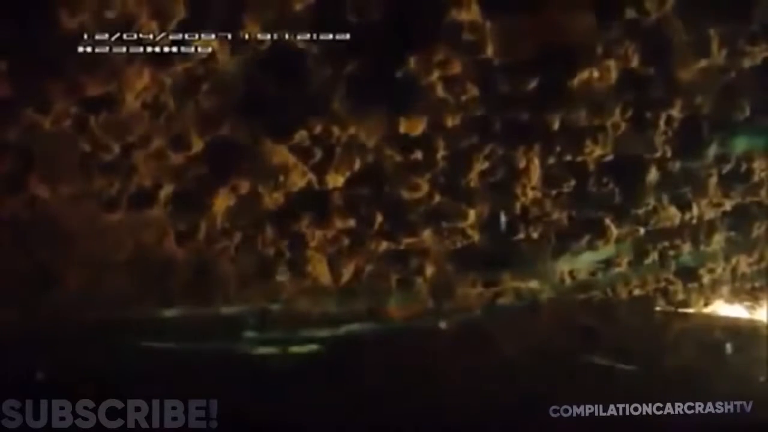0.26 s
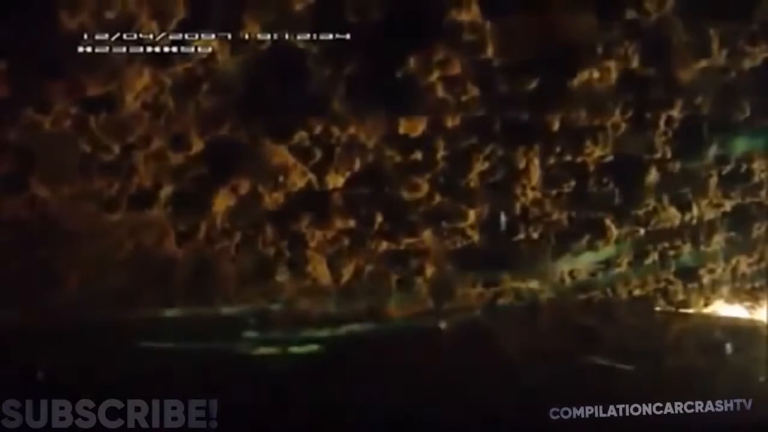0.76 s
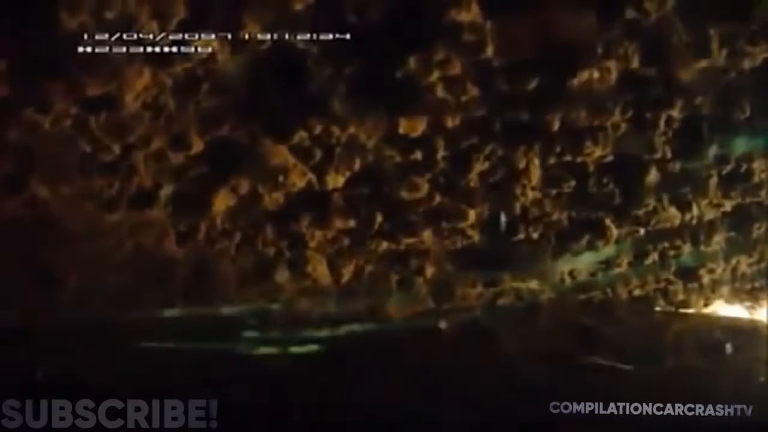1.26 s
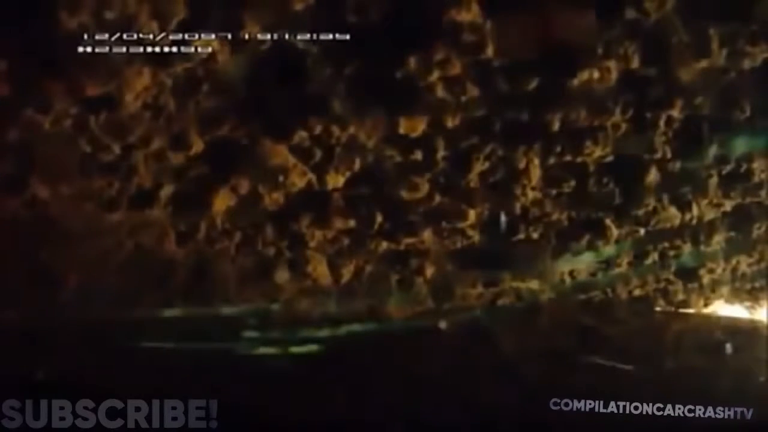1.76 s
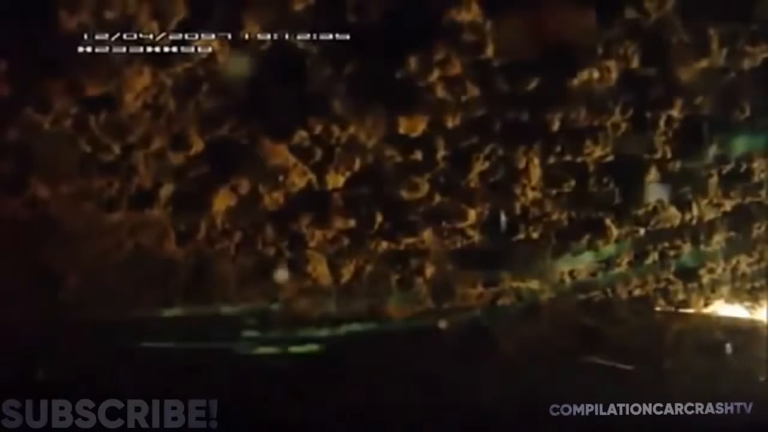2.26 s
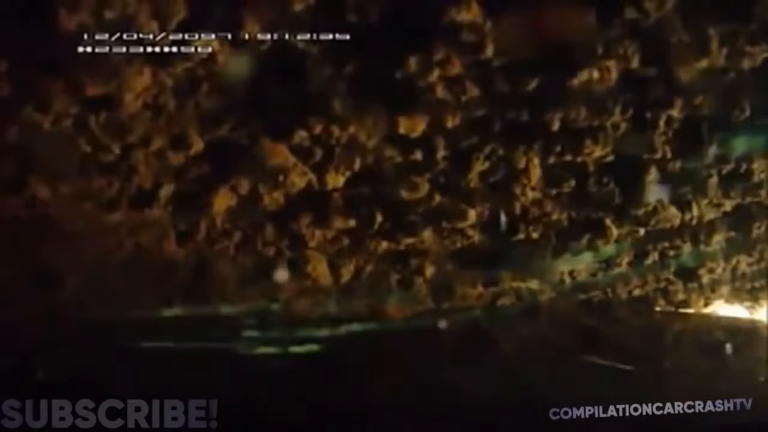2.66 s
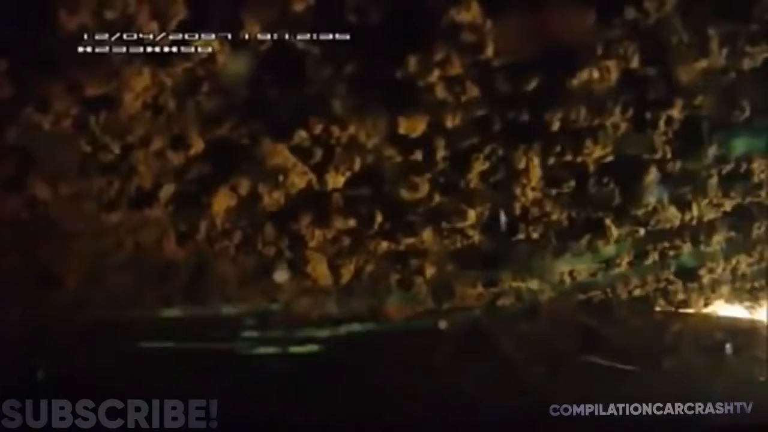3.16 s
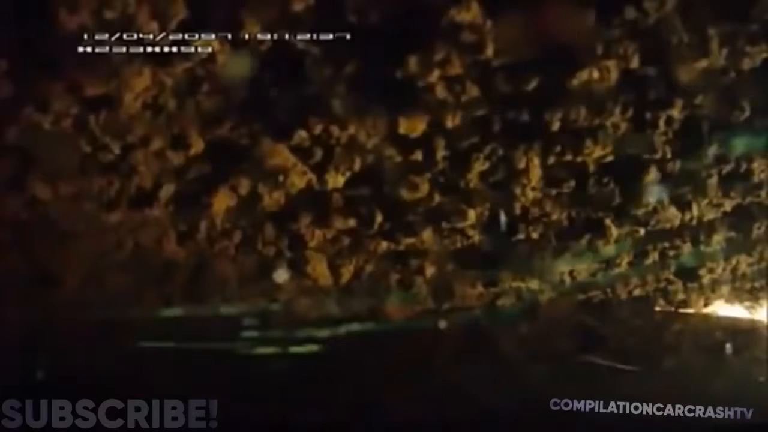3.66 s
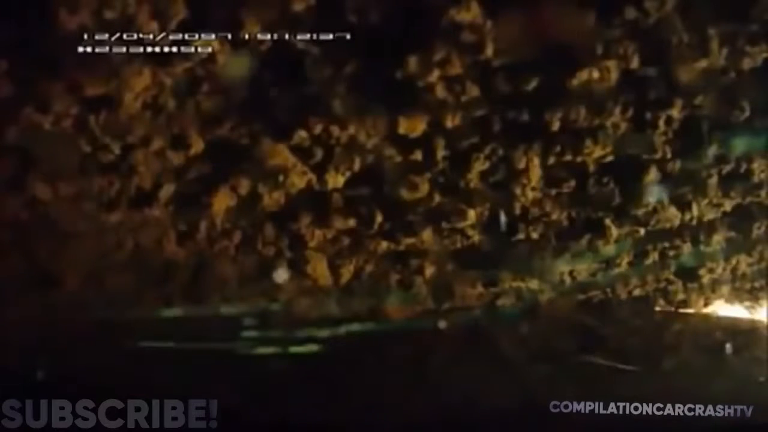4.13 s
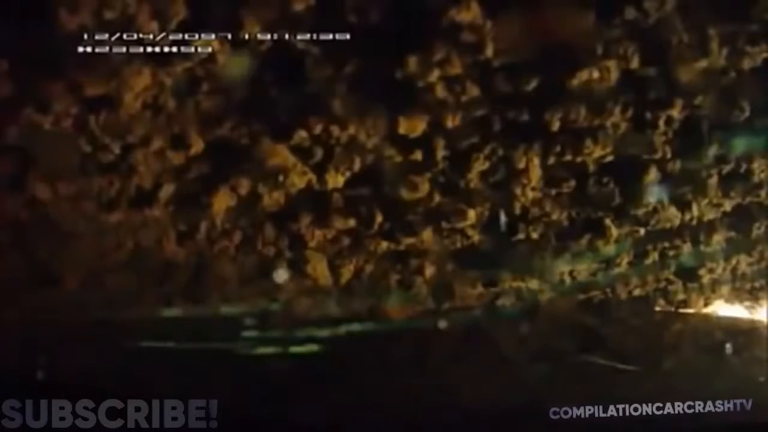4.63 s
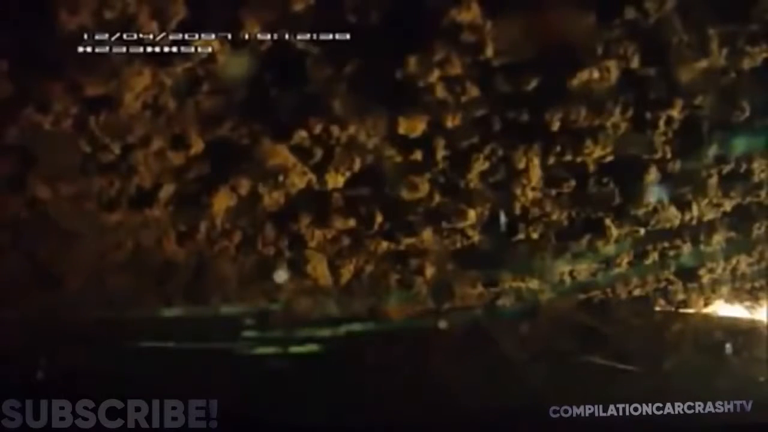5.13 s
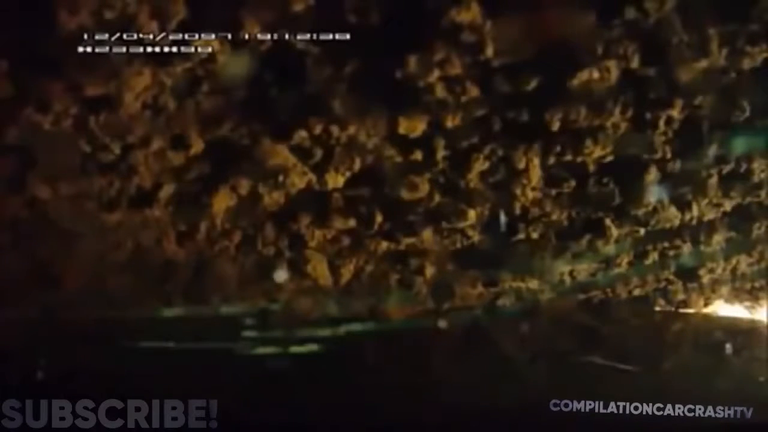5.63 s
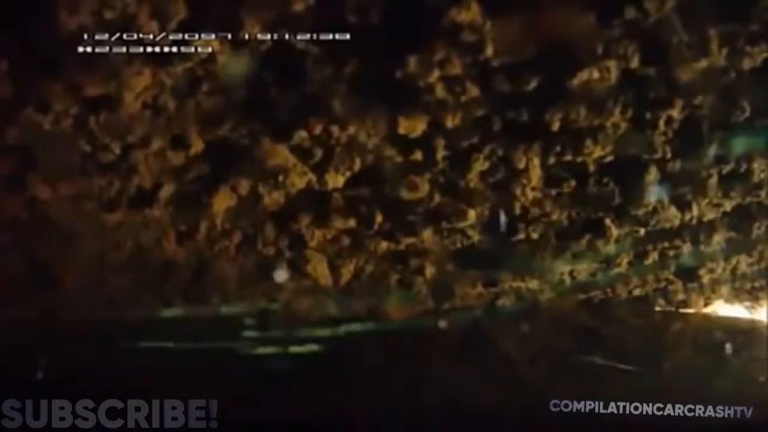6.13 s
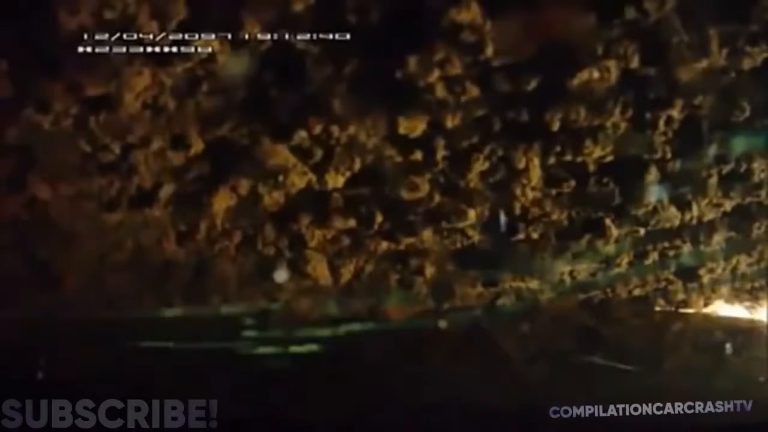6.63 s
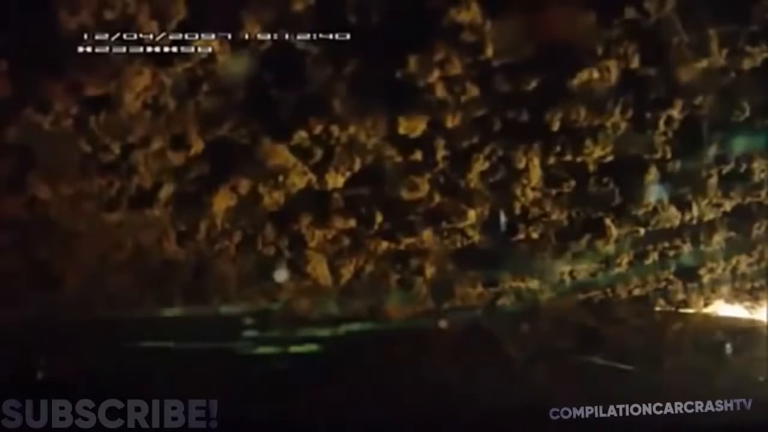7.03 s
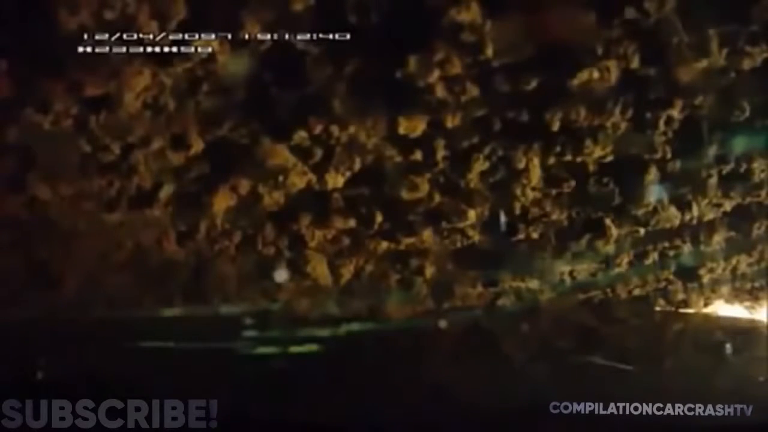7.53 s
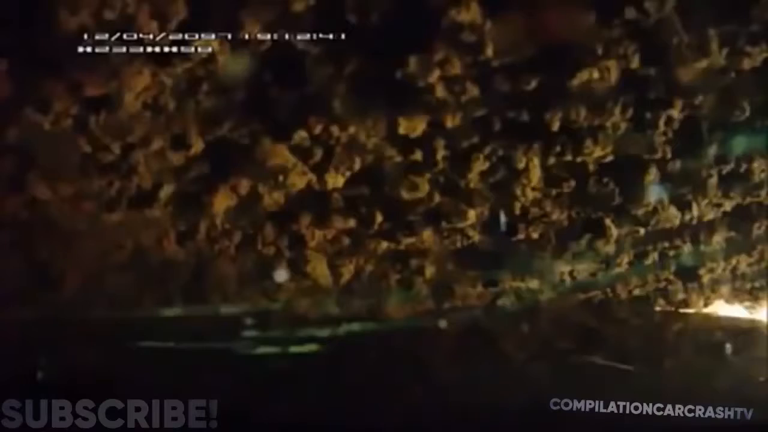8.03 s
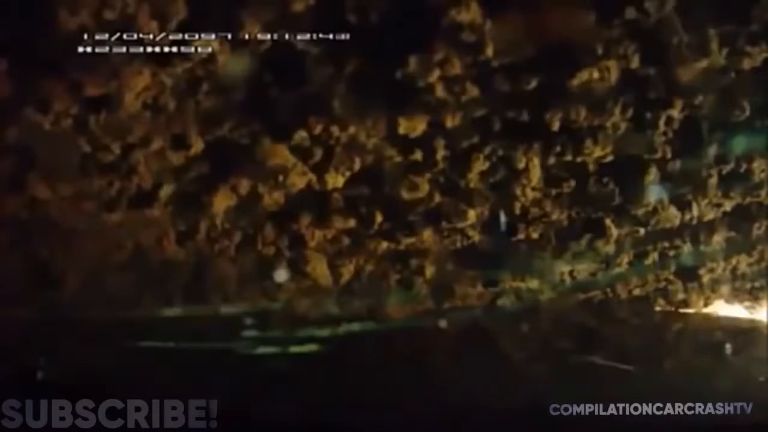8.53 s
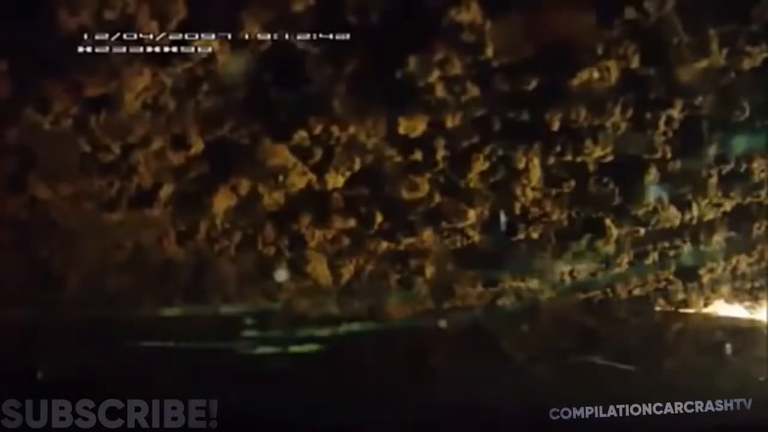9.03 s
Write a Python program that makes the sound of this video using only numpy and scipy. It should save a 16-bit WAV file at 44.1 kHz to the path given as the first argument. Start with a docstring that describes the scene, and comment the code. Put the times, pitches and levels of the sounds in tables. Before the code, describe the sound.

Inside a car coming to rest in a thicket, heard through a small, boxy dashboard microphone. From 0 to 0.8 s the body rumbles and sways while branches shove the panels: quick dull knocks, a heavy thud and a sharp crack near 0.4. It calms to light rubbing and small ticks until about 2. At 2.2 scraping grows; from 2.4 to 3 come loud hollow knocks, deep thumps and snapping twigs, then bright, gritty hisses and short nasal squeaks until 3.8. Single firm knocks strike at about 4.25 and 4.6 among lighter taps. A hard cluster of woody blows hits at 5.5 to 5.6, followed by a dull shove around 6.2. From 6.5 to 8.2 it is nearly still, with faint ticks over a low, grainy hum. Small scrapes and creaks return at 8.3 and 8.6; rumbling scrapes and a knock swell at 9.1 to 9.3.

```python
"""Inside a car that has come to rest in a thicket, heard through a small dashboard camera's microphone.
Things scrape along and knock against the body and the camera's plastic shell. Random slips drive gritty
rubbing and dull shoves, gliding bands of noise squeak, noise bursts tick, and damped sines make the short
hollow knocks and deep thuds. One set of body resonances colours shoves, rubbing and knocks, over a low
swaying rumble and a grainy noise floor."""
import sys
import numpy as np
from scipy import signal
from scipy.io import wavfile
from scipy.ndimage import uniform_filter1d

SR = 44100
rng = np.random.default_rng(int(sys.argv[2]) if len(sys.argv) > 2 else 0)


def wav_out(sig):
    """Save sig, one row per channel (or a flat mono array), as 16-bit PCM at SR to the path in sys.argv[1]."""
    wavfile.write(sys.argv[1], SR, np.round(np.clip(np.atleast_2d(sig).T, -1, 1) * 32767).astype(np.int16))


N = 409677


def gain_of(db):
    """Amplitude factor of a level in dB."""
    return 10 ** (np.asarray(db) / 20)


def evened(x):
    """Bring a signal to an rms of 1."""
    return x / np.sqrt(np.mean(x ** 2) + 1e-20)


def smoothed(x, width, axis=-1):
    """Average twice, for a softer curve than one moving average gives."""
    return uniform_filter1d(uniform_filter1d(x, width, axis), width, axis)


def read(points, hz):
    """Read a curve of (frequency, value) points on a logarithmic frequency scale."""
    point_hz, value = np.transpose(points)
    return np.interp(np.log(hz + 1), np.log(point_hz + 1), value)


def columns(rows):
    """Draw each column after the first as an automation curve over time."""
    start_s, *values = np.transpose(rows)
    t = np.arange(N) / SR
    return [np.interp(t, start_s, value) for value in values]


def add(mix, start_s, sound):
    """Lay a sound into the mix, cut off at the mix's end."""
    part = mix[round(start_s * SR):][:len(sound)]
    part += sound[:len(part)]


def colour(points, size=8192):
    """Causal minimum-phase filter of energy 1 with the given spectral shape."""
    shape_db = np.maximum(read(points, abs(np.fft.fftfreq(size, 1 / SR))), -100)
    log_gain = np.log(gain_of(shape_db))
    spectrum = np.exp(np.conj(signal.hilbert(log_gain)))
    taps = np.fft.ifft(spectrum).real[:size // 2]
    return taps / np.linalg.norm(taps)


def through(drive, taps):
    """Send a drive through a filter scaled to energy 1."""
    return signal.oaconvolve(drive, taps / np.linalg.norm(taps))[:N]


def grit(per_s, spread_db, clump_db, clump_s, smooth):
    """Stick-slip: random slips, a few large, coming in clumps, over a smooth share of noise."""
    size_db = spread_db * np.minimum(rng.exponential(1, N), 4)
    happens = rng.random(N) < per_s / SR
    slips = gain_of(size_db) * rng.standard_normal(N) * happens
    clumps = evened(smoothed(rng.standard_normal(N), max(round(clump_s * SR), 2)))
    grains = evened(slips) + smooth * rng.standard_normal(N)
    return evened(grains * gain_of(clump_db * clumps))


def ring(modes, length, rise_s, turns=0):
    """Sum of dying sines after a soft contact; turns sets their starting phases in cycles."""
    pitch_hz, level_db, t60_s = np.transpose(modes)[:, :, None]
    t = np.arange(length) / SR
    decay = gain_of(level_db - 60 * t / np.maximum(t60_s, .004))
    sines = np.sin(2 * np.pi * (pitch_hz * t + turns))
    return (1 - np.exp(-t / rise_s)) * (decay * sines).sum(0)


# spectral shape of the noise floor: pitch_hz [Hz], shape_db [relative dB per Hz]
FLOOR_SHAPE = [(12, -24.5), (20, -11.5), (64, -20.5), (171, 6.5), (232, -13.5), (394, -3.5), (536, -24),
               (935, -20), (1050, -14), (2620, -48.5), (3660, -46.5), (4710, -63), (7560, -50),
               (11800, -69), (15600, -58)]
FLOOR_DB = -44


def noise_floor():
    """A quiet, slightly grainy bed: dense random slips through a bass-heavy filter."""
    grains = grit(820.0, 2.7, 0.7, 0.01, smooth=0.17)
    return gain_of(FLOOR_DB) * through(grains, colour(FLOOR_SHAPE))


# level of the whole car's sway: start_s [s], level_db [dB]
SWAY_LEVEL = [(0.0, -21.5), (0.59, -20), (0.98, -28.5), (2.2, -30), (2.74, -19), (3.85, -33), (4.76, -33),
              (5.04, -35), (5.9, -35), (7.4, -37.5), (9.0, -38.5), (9.29, -23)]
# spectral shape of the sway: pitch_hz [Hz], shape_db [relative dB per Hz]
SWAY_SHAPE = [(13, -32), (22, 24.5), (32, -6), (65, 2), (102, -3.5), (130, -7.5), (170, -28.5), (290, -120)]


def rocking():
    """The whole car rocks: noise of changing level, filtered down to deep bass."""
    level_db, = columns(SWAY_LEVEL)
    return through(gain_of(level_db) * rng.standard_normal(N), colour(SWAY_SHAPE))


def swell(length_s, swell_share):
    """A scrape grips, swells to its top, fades and lets go."""
    grip_s, let_go_s, ends_db = 0.01, 0.026, -12  # ends_db is relative to the top
    t = np.arange(0, length_s, 1 / SR)
    edges = np.clip(np.minimum(t / grip_s, (length_s - t) / let_go_s), 0, 1)
    top_s = np.clip(swell_share, 0, 1) * length_s
    return edges * gain_of(np.interp(t, [0, top_s, length_s], [ends_db, 0, ends_db]))


# steady pressure of the branches:
# start_s [s], panel rumble_db [dB], shell ring_db [dB], hiss_db [dB]
PRESSURE = [(0.0, -21.5, -29.5, -33.5), (0.46, -19.5, -28.5, -49), (0.88, -36, -33.5, -43),
            (1.27, -40, -43.5, -49), (1.94, -39.5, -46.5, -64), (2.35, -24, -34.5, -29),
            (2.64, -18.5, -34, -41), (3.15, -29, -28, -42), (3.67, -40, -39.5, -50.5),
            (4.11, -35, -29, -39.5), (4.53, -38.5, -33, -44), (4.92, -32.5, -40, -49.5),
            (5.67, -27, -29, -39.5), (6.0, -37.5, -37, -52), (7.14, -49, -62.5, -67),
            (7.76, -51, -42.5, -55.5), (8.31, -46.5, -52.5, -62.5), (8.49, -40, -38.5, -43.5),
            (8.9, -36.5, -35.5, -50.5), (9.29, -27.5, -28.5, -33.5)]
# scrapes: start_s [s], length_s [s], swell_share [share of length], panel rumble_db [dB],
# shell ring_db [dB], hiss_db [dB], tilt_db [brightness, dB per octave]
SCRAPES = [(0, 0.085, 0.2, -11.5, -16.5, -33, -2.5), (0.129, 0.096, .55, -15.5, -18.5, -39, -4),
           (0.357, 0.14, 0.46, -25, -47, -28, -2), (0.567, 0.09, 0.14, -23.5, -59, -31, 4),
           (0.718, 0.12, 0.38, -19.5, -24, -32, 1.5), (0.855, 0.19, 0.24, -40, -34, -45, 6),
           (1.187, .15, 0.21, -41, -36.5, -33, 0), (1.375, 0.14, 0.28, -34.5, -36.5, -35, 0.5),
           (1.526, 0.11, 0.65, -24, -34, -31.5, -3), (1.967, 0.32, 0.12, -51, -35.5, -36, 2),
           (2.174, .26, 0.44, -49, -22.5, -23.5, 4), (2.418, 0.061, 0.56, -17.5, -19, -16.5, -3.5),
           (2.59, 0.33, 0.22, -27.5, -18.5, -21.5, -2), (2.996, 0.11, 0.37, -49, -20, -15.5, 0.5),
           (3.178, 0.031, .5, -41, -31, -28.5, -1.5), (3.228, 0.11, 0.31, -30, -31.5, -9.5, 4.5),
           (3.503, 0.068, 0.26, -48, -31, -34.5, 1), (3.638, 0.14, 0.42, -32, -28, -19, 1),
           (3.712, 0.13, 0.44, -46, -25, -7.5, 4), (3.882, 0.14, .4, -50, -38, -38, -2),
           (4.121, 0.055, 0.36, -29, -36, -38, -12), (4.206, 0.11, 0.27, -26, -33, -29.5, 4),
           (4.309, 0.057, 0.73, -45, -44, -31, -12.5), (4.624, 0.055, 0.66, -42, -42, -35, -5.5),
           (4.766, 0.18, 0.59, -29, -29.5, -46.5, 4), (5.064, 0.15, 0.79, -28.5, -33.5, -26.5, -0.5),
           (5.334, .13, 0.53, -64, -48, -28, 2), (5.808, 0.094, 0.63, -45, -29, -48, -16),
           (5.684, 0.18, 0.74, -34, -39, -41, 1), (6.203, 0.14, 0.45, -19.5, -31, -42, 2.5),
           (6.38, 0.11, 0.28, -41, -44, -54, 1), (7.383, 0.11, 0.74, -53, -48, -63, -9),
           (7.82, .07, 0.39, -35.5, -54, -52, -5), (7.928, 0.096, .4, -34.5, -40, -50, -6),
           (8.321, 0.1, 0.22, -25, -21.5, -26, 1), (8.53, .115, 0.51, -32, -26.5, -28, 0.5),
           (8.633, .12, 0.44, -38, -34, -39, 2), (8.861, 0.19, 0.37, -62, -49, -36, 9),
           (9.013, 0.11, 0.54, -46, -38, -33.5, -1.5), (9.098, 0.063, .5, -24, -28, -40, 11),
           (9.188, 0.055, 0.65, -20, -13.5, -47, -18), (9.247, 0.05, 0.41, -24, -17, -36, -13)]


def force(axis):
    """The steady pressure plus the swell of every scrape, for rumble (0), ring (1) or hiss (2)."""
    out = gain_of(columns(PRESSURE)[axis])
    for start_s, length_s, swell_share, *levels_db, _ in SCRAPES:
        add(out, start_s, gain_of(levels_db[axis]) * swell(length_s, swell_share))
    return out


def brightness():
    """Tilt of the hiss: pressure and scrapes each lend theirs in proportion to their hiss."""
    steady_tilt_db = -2.5  # per octave
    out = steady_tilt_db * gain_of(columns(PRESSURE)[2])
    for start_s, length_s, swell_share, *_, hiss_db, tilt_db in SCRAPES:
        add(out, start_s, tilt_db * gain_of(hiss_db) * swell(length_s, swell_share))
    return out / force(axis=2)


# resonances of panels and shell, shared with rubbing and knocks:
# pitch_hz [Hz], level_db [relative dB], t60_s [s to die by 60 dB]
BODY_MODES = [(189, 3.5, 0.035), (249.7, 11.5, 0.022), (314.3, 9, 0.027), (425, 7.5, 0.026),
              (574.6, 3.5, 0.026), (817, 6.5, 0.02), (930.5, 13.5, 0.016), (1051, -2, 0.046),
              (1259, 2.5, 0.028), (1494, 2, 0.016), (1738, -11, 0.037)]


def shoving():
    """Coarse slips ring the low panel modes, heard as dull shoves."""
    panels = [mode for mode in BODY_MODES if mode[0] < 650]
    slips = grit(400, 3, 2.5, .01, smooth=.5)
    return through(force(axis=0) * slips, ring(panels, 4096, 0.026))


def wandering(x, patchy_db, frames, bins):
    """The contact point moves: the colour tilts with each scrape and drifts in random patches."""
    hz, t, z = signal.stft(x, SR, nperseg=256)
    patches = uniform_filter1d(rng.standard_normal(z.shape), max(round(bins), 1), 0)
    patches = evened(smoothed(patches, round(frames), 1))
    octaves = np.log2((hz[:, None] + 500) / 6000)
    tilt_db = octaves * np.interp(t, np.arange(N) / SR, brightness())
    makeup_db = patchy_db ** 2 * np.log(10) / 20  # the patches leave the average power unchanged
    z = z * gain_of(tilt_db + patchy_db * patches - makeup_db)
    return signal.istft(z, SR, nperseg=256)[1][:N]


# spectral shape of the hiss, shared with ticks: pitch_hz [Hz], shape_db [relative dB per Hz]
HISS_SHAPE = [(820, -25.5), (1400, 2.5), (1840, 2.5), (2050, -0.5), (3010, -8), (3540, -3), (4120, -11),
              (4840, -6), (6890, -2.5), (7470, 5), (8430, -1), (12000, -11), (15600, -23)]


def rubbing():
    """Fine slips hiss in the air; coarser ones ring the shell's middle modes."""
    fine_slips = grit(6000., 1.9, 2.21, 0.011, smooth=0.87)
    hiss = through(force(axis=2) * fine_slips, colour(HISS_SHAPE))
    shell = [mode for mode in BODY_MODES if 650 < mode[0] < 2000]
    coarse_slips = grit(900, 3.5, 3, .006, smooth=.35)
    shell_ring = through(force(axis=1) * coarse_slips, ring(shell, 4096, 0.0021))
    return wandering(hiss, 3.5, frames=7., bins=2.2) + shell_ring


# squeaks: start_s [s], length_s [s], from_hz [Hz], to_hz [Hz],
# width_hz [Hz, of each of two stacked resonances], level_db [dB]
SQUEAKS = [(3.023, .075, 915, 885, 199, -17.5), (3.296, .03, 896, 884, 200, -14),
           (3.632, .07, 892, 938, 150, -28), (3.715, .03, 872, 837, 119, -9),
           (3.739, .05, 1950, 1670, 301, -24), (3.766, .045, 932, 896, 149.6, -9),
           (5.089, 0.12, 1150, 1206, 300, -26.5), (5.336, .1, 869, 4210, 650, -34),
           (6.219, .07, 2350, 2200, 400, -46), (6.242, .04, 318, 342, 89, -38),
           (6.265, .05, 899, 870, 248, -33), (8.341, .06, 924, 895, 250, -21),
           (8.345, .05, 292, 283, 89.5, -16.5), (8.567, .055, 883, 892, 220, -20.5),
           (8.587, .04, 294, 313, 90, -26.5), (9.04, .12, 305, 287, 120, -27)]


def squeaks():
    """Noise in a narrow band glides as the contact speeds up or slows down, broken up by slips."""
    out = np.zeros(N)
    slips = .3 + smoothed(abs(grit(900., 3., 4.4, .004, smooth=.6)), 70)
    noises = rng.standard_normal((len(SQUEAKS), 2, 8000))
    for (start_s, length_s, from_hz, to_hz, width_hz, level_db), noise in zip(SQUEAKS, noises):
        hz = np.linspace(from_hz, to_hz, round(length_s * SR))
        r = np.exp(-np.pi * width_hz / SR)
        flutter = signal.lfilter([1], [1, -2 * r, r * r], noise[0] + 1j * noise[1])[-len(hz):]
        tone = (flutter * np.exp(2j * np.pi * np.cumsum(hz) / SR)).real
        broken = evened(tone * slips[round(start_s * SR):][:len(hz)])
        add(out, start_s, gain_of(level_db) * broken * signal.windows.tukey(len(hz), .5))
    return out


# dry ticks: start_s [s], level_db [approximate peak dB before the hiss filter], t60_s [s]
TICKS = [(0.194, -18.5, 0.032), (0.3674, -20, 0.045), (0.4269, 3, 0.04), (0.5705, -22, 0.044),
         (0.6565, -21.5, 0.094), (0.7412, -32, 0.023), (0.9126, -21, 0.034), (1.101, -24.5, 0.067),
         (1.718, -27, 0.036), (1.756, -30, 0.044), (1.946, -31.5, .03), (2.4957, -6, 0.065),
         (2.582, -6.5, 0.037), (2.614, -19, 0.03), (2.6448, -2.5, 0.035), (2.8519, -19, 0.03),
         (2.9052, -3.5, 0.023), (3.0187, -15, 0.017), (3.227, -18, 0.018), (3.351, -5.5, 0.077),
         (3.451, -14.5, 0.025), (3.632, -20, 0.025), (3.927, -18, 0.024), (3.9653, -12.5, 0.034),
         (4.0457, -15, 0.029), (4.0644, -7.5, 0.064), (4.141, -15.5, 0.18), (4.2133, -13, 0.054),
         (4.236, -20, 0.22), (4.397, -22, 0.022), (4.35, -30, 0.021), (4.528, -17.5, 0.062),
         (4.754, -14.5, 0.011), (4.8144, -23.5, 0.097), (4.9756, -41, 0.023), (5.046, -21, 0.024),
         (5.17, -23, 0.044), (5.4216, -18, 0.026), (5.4899, -5.5, 0.031), (5.5496, -1.5, 0.092),
         (5.623, -14, 0.069), (5.8195, -29, 0.045), (6.427, -27.5, 0.048), (6.5076, -35, 0.066),
         (6.54, -37, 0.035), (6.705, -18, 0.036), (6.8713, -36.5, 0.051), (7.1102, -38, 0.086),
         (7.313, -38, 0.064), (7.339, -39, 0.021), (7.417, -25.5, 0.028), (7.458, -33.5, 0.024),
         (7.5668, -23.5, 0.07), (7.65, -33, 0.032), (7.7892, -34, 0.036), (7.854, -26.5, 0.041),
         (7.9794, -36.5, 0.03), (8.2716, -38, 0.067), (8.306, -19, 0.041), (8.289, -36, .02),
         (8.919, -24, 0.035), (8.969, -28, 0.03)]


def ticks():
    """Twigs and grit snap: a burst of hiss that dies at once; small ones fall at random."""
    noise_crest_db = 10  # peak of a noise burst over its rms
    small_per_s, small_db, small_t60_s = 17, 2.5, .02  # small_db is relative to the steady hiss
    drive, t = np.zeros(N), np.arange(4000) / SR
    noises = rng.standard_normal((len(TICKS), len(t)))
    for (start_s, level_db, t60_s), noise in zip(TICKS, noises):
        decay_db = -60 * t / max(t60_s, .004)
        add(drive, start_s, gain_of(level_db - noise_crest_db + decay_db) * noise)
    sizes = gain_of(3.14 * np.minimum(rng.exponential(1, N), 3))
    small = sizes * (rng.random(N) < small_per_s / SR)
    small = signal.lfilter([1], [1, -gain_of(-60 / small_t60_s / SR)], small)  # each dies away
    drive += gain_of(columns(PRESSURE)[2] + small_db) * small * rng.standard_normal(N)
    return through(drive, colour(HISS_SHAPE))


# deep thuds of the whole car: start_s [s], level_db [dB, before the soft onset], pitch_hz [Hz]
THUDS = [(0.363, -4, 68.5), (.707, -20, 56.5), (2.368, -18, 89), (2.679, -10, 67), (2.758, -10.5, 55.6),
         (2.853, -4, 77), (3.241, -12.5, 75.3), (3.41, -15, 107), (4.099, -18, 75.4), (6.29, -22.5, 82),
         (8.234, -20, 36.3)]


def thuds():
    """The car drops on its springs: one deep, damped swing."""
    swings = 17.  # cycles until a thud has died by 60 dB
    out = np.zeros(N)
    for start_s, level_db, pitch_hz in THUDS:
        add(out, start_s, ring([(pitch_hz, level_db, swings / pitch_hz)], 24000, 0.0046))
    return out


# knocks: start_s [s], pitch_hz [Hz, of the mode struck hardest],
# low_db, mid_db, high_db [dB with which the blow reaches the modes near each REACH_HZ]
KNOCKS = [(.036, 280.3, -16, -15, -30), (0.161, 206, -14.5, -8, -35), (0.275, 191, -9, -21, -30),
          (0.326, 360, -20, -16, -29), (.364, 167, -2.5, -6, -11), (0.376, 200, -3, -15, -22),
          (0.426, 242, -5, 4.5, -1), (.462, 433, -7, 4, -11.5), (.503, 900, -20, -28, -24),
          (0.516, 324, -14, -17, -28.5), (.569, 279, -8.5, -7, -24), (0.698, 216, -15.5, -13, -20),
          (0.89, 768, -16, -7, -19), (1.473, 433, -23.5, -41, -49), (1.563, 252, -29, -34, -33),
          (2.069, 1000, -30, -29, -20), (2.228, 993, -30, -22, -33), (2.272, 700, -25, -21, -11),
          (2.29, 1040, -22, -8.5, -20), (2.499, 796, -4, 11.5, 9.5), (2.559, 167, 6.5, -4, -20),
          (2.631, 380, -26, -25, -7), (2.687, 415, -17, -16, -7), (2.709, 174, -11, -33, -19),
          (2.746, 152, -13.5, -15, -17), (2.811, 790, -24, 3.5, -23), (2.851, 168, -5, -3, -30),
          (2.903, 189, -23, -13, -27.5), (3.023, 840, -28, -11.5, -16), (3.15, 363, -20.5, -20, -52),
          (3.335, 754, -17, -11.5, -17), (3.511, 935, -28, -30, -31), (3.538, 910, -21.5, -29.5, -21),
          (3.675, 910, -26, -23.5, -29), (3.923, 462, -24, -31, -25), (3.987, 1010, -20, -24.5, -27),
          (4.114, 555, -17.5, -17.5, -21), (4.254, 890, 8.5, 3.5, -1), (4.316, 570, -30, -26, -19),
          (4.62, 546, 7, -2, -26), (4.777, 332, -25.5, -27, -53), (4.808, 443, -21, -26, -36),
          (4.835, 430, -26, -24, -35), (4.872, 404, -25, -15, -26), (4.934, 460, -37, -20.5, -28),
          (4.975, 520, -17.5, -19.5, -21.5), (5.027, 340, -23, -23.5, -41), (5.049, 310, -24, -31, -23),
          (5.141, 323, -21, -25, -12), (5.166, 189, -16.5, -42, -7), (5.221, 283, -20, -25, -22),
          (5.384, 300, -31, -22, -33), (5.485, 990, -21, -8.5, -15), (5.509, 253, 8, 5, -2),
          (5.55, 365, 5.5, 11.5, -14), (5.576, 243, -3.5, -3.5, -27), (5.597, 326, -13.5, -27, -60),
          (5.615, 224, -19.5, -18.5, -40), (5.635, 366, -16.5, -24, -27.5), (5.702, 342, -23, -42, -94),
          (5.729, 188, -37, -17, -55), (5.787, 430, -23.5, -29, -32), (6.066, 340, -26.5, -24.5, -54.5),
          (6.233, 886, -47, -18.5, -25.5), (6.272, 190, -36, -10.5, -49), (6.326, 166, -21.5, -28, -63),
          (6.449, 328, -41.5, -33, -43.5), (6.706, 830, -35, -24, -44), (6.83, 356, -40.5, -29.5, -46),
          (7.37, 920, -58, -37.5, -52), (7.415, 945, -44, -38, -40), (7.5, 205, -41, -31.5, -45),
          (7.564, 174, -49, -33.5, -30), (7.648, 197, -36.5, -34, -41), (7.95, 175, -34, -41, -45),
          (7.981, 171, -40, -34, -41), (8.235, 300, -39, -31, -71), (8.307, 298, -32, -22.5, -51),
          (8.531, 840, -53, -15, -33), (8.598, 277, -31, -23, -42), (8.673, 388, -33, -30, -34),
          (8.908, 444, -31.5, -19.5, -30), (9.079, 328, -23, -19, -29), (9.246, 440, -4, -8, -19),
          (9.269, 910, -14, -24, -18)]
# where those three levels apply: pitch_hz [Hz]
REACH_HZ = [300, 900, 2400]


def knocks():
    """Each blow cracks and rings all modes by where it lands; the nearest bends to the spot and rings most."""
    crack_db, struck_db = -4, 10.5  # crack against high_db; extra ring of the mode at the spot
    rise_s, crack_t60_s = .0025, 0.037
    out, cracks = np.zeros(N), np.zeros(N)
    mode_hz, mode_db, t60_s = np.transpose(BODY_MODES)
    chances = rng.random((len(KNOCKS), len(BODY_MODES)))
    noises = rng.standard_normal((len(KNOCKS), 2000))
    fade = gain_of(-60 * np.arange(2000) / SR / crack_t60_s)
    for (start_s, pitch_hz, *reach_db), chance, noise in zip(KNOCKS, chances, noises):
        struck = np.arange(len(mode_hz)) == np.argmin(abs(np.log(mode_hz / pitch_hz)))
        detuned_hz = mode_hz * (1 + 0.25 * (chance - .5))
        bent_hz = np.where(struck, pitch_hz, detuned_hz)
        weight_db = read(list(zip(REACH_HZ, reach_db)), mode_hz) + struck_db * struck
        modes = np.transpose([bent_hz, mode_db + weight_db, t60_s])
        add(out, start_s, ring(modes, 6000, rise_s, 3 * chance[:, None]))
        add(cracks, start_s, gain_of(reach_db[-1] + crack_db) * fade * noise)
    no_deep_bass = signal.butter(2, 110., "high", fs=SR, output="sos")  # the knocks carry no deep bass
    crack_band = signal.butter(2, [1300., 4200.], "band", fs=SR, output="sos")
    return signal.sosfilt(no_deep_bass, out) + signal.sosfilt(crack_band, cracks)


# difference between the channels, mostly deep bass: pitch_hz [Hz], side_db [dB against the middle]
STEREO_SPREAD = [(25, -3), (60, -17), (125, -30), (400, -60)]


def spread(mid):
    """Widen the deep bass: a phase-scrambled copy is added on the left and subtracted on the right."""
    hz, _, z = signal.stft(mid, SR, nperseg=2048)
    scramble = np.exp(2j * np.pi * rng.random(z.shape))
    z = z * gain_of(read(STEREO_SPREAD, hz))[:, None] * scramble
    side = signal.istft(z, SR, nperseg=2048)[1][:N]
    return mid + side * [[1], [-1]]


def scene():
    """Background, scrapes and blows summed in the middle, then spread to two channels."""
    background = noise_floor() + rocking()
    scraping = shoving() + rubbing() + squeaks()
    blows = ticks() + thuds() + knocks()
    return spread(background + scraping + blows)


# treble resonances of the microphone port: pitch_hz [Hz], width_hz [Hz], lift_db [dB]
PORT = [(3692, 300, 9.5), (7850, 6300, -5.5), (11250, 500, 2.5)]


def record(dry):
    """The input cuts the deepest bass; the port shapes three treble bands; limiter, clip and band limit follow."""
    edge_hz, ceiling, recovery_db_per_s = 15800, .9, 1190.0
    dry = signal.sosfilt(signal.butter(2, 22, "high", fs=SR, output="sos"), dry)
    lifted = dry
    for pitch_hz, width_hz, lift_db in PORT:  # a negative lift dips
        band = signal.lfilter(*signal.iirpeak(pitch_hz, pitch_hz / width_hz, fs=SR), dry)
        lifted = lifted + (gain_of(lift_db) - 1) * band
    # both channels share one gain, set by the louder
    over_db = np.maximum(20 * np.log10(abs(lifted).max(0) / ceiling + 1e-9), 0)
    fall_db = np.arange(N) * recovery_db_per_s / SR
    held_db = np.maximum.accumulate(over_db + fall_db) - fall_db
    limited = lifted / gain_of(uniform_filter1d(held_db, size=45))
    clipped = np.clip(limited, -.98, .98)
    lowpass = signal.firwin(601, edge_hz, window=("kaiser", 9), fs=SR)
    return signal.oaconvolve(clipped, lowpass[None], "same", axes=1)


dry = scene()
out = record(dry)
wav_out(out)
```